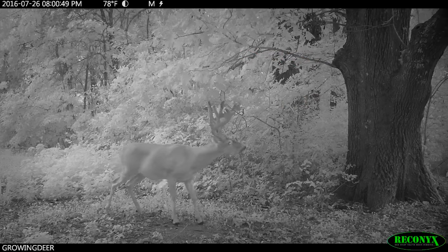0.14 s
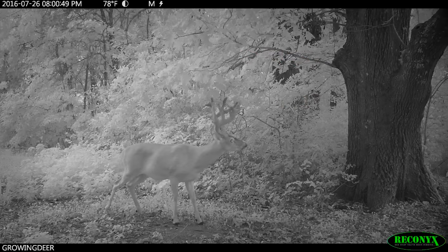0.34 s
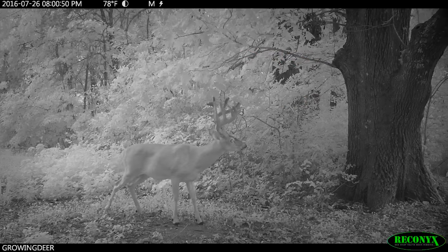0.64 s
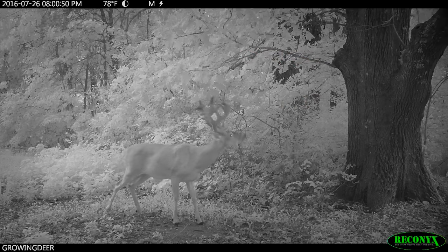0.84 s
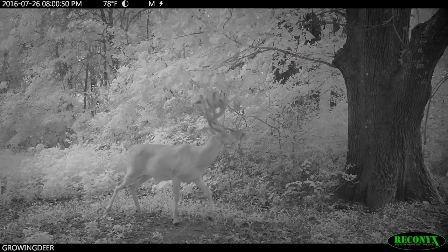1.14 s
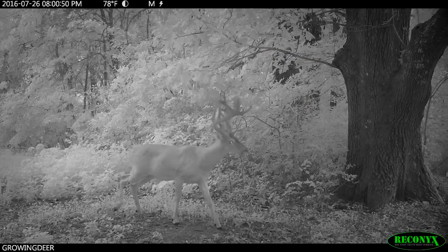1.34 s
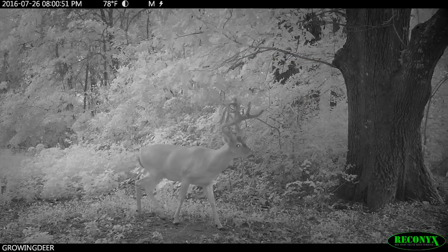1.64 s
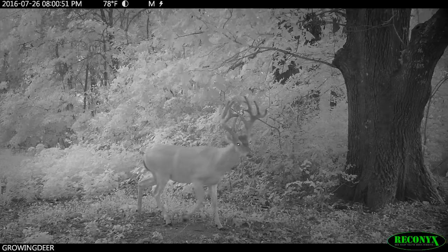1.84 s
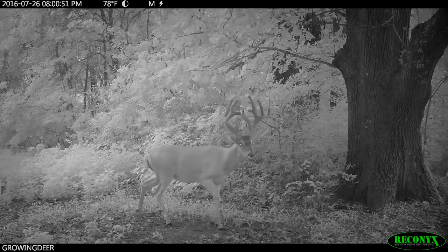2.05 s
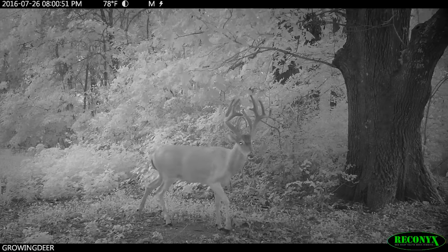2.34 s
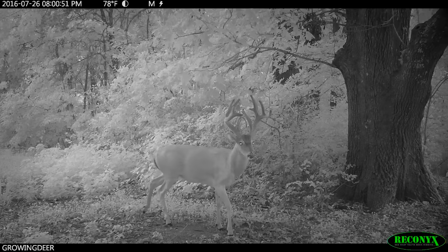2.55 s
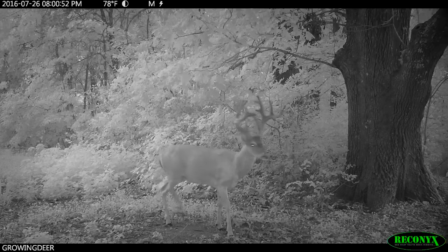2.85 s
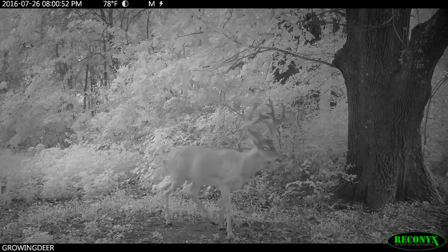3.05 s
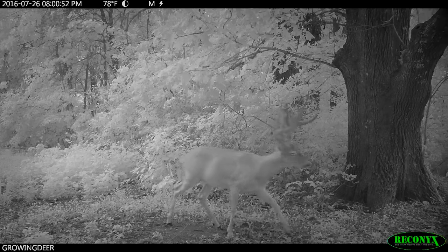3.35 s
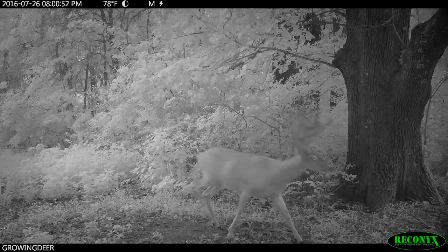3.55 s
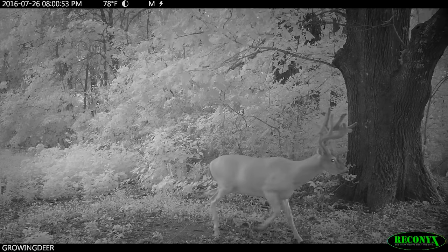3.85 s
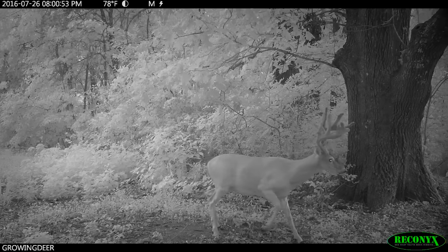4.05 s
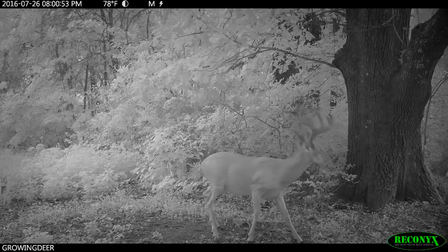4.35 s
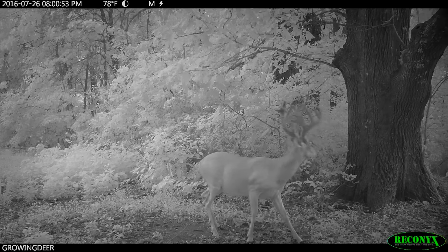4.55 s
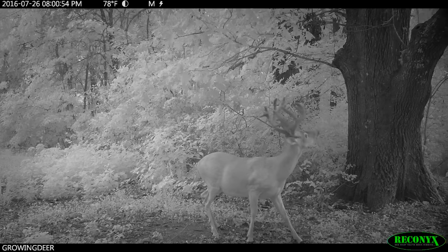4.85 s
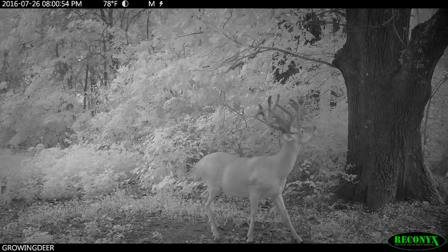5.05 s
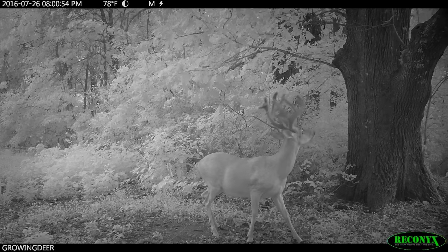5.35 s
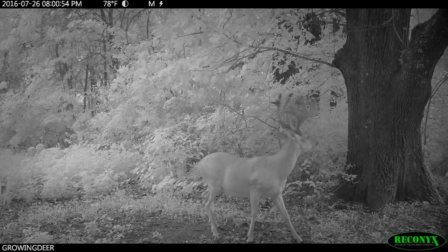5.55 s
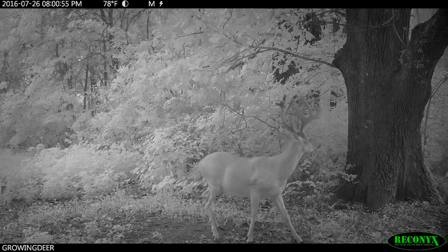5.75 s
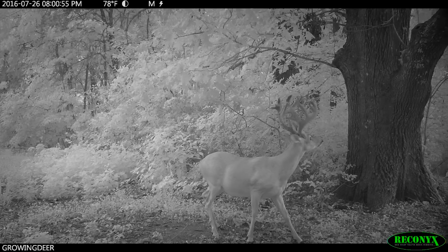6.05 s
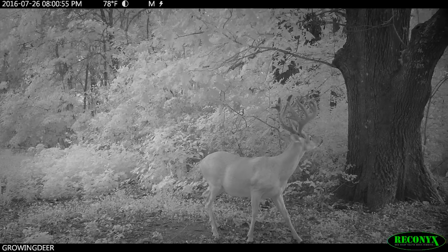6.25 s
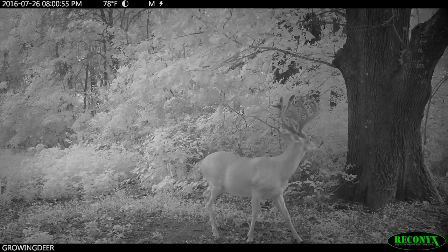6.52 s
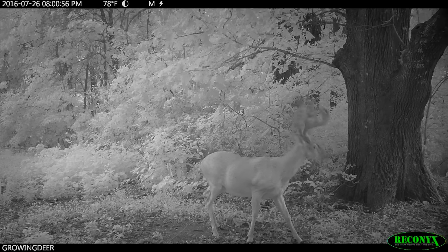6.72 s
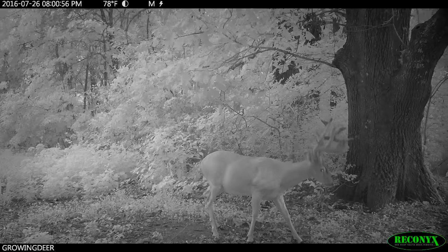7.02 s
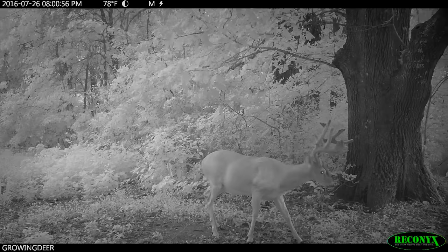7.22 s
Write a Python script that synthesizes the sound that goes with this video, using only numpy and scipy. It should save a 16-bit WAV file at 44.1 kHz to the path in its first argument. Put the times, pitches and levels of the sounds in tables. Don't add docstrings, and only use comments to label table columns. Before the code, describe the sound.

Throughout about 7.4 seconds, a wood at dusk is filled with a high, glassy chorus of crickets around 6 to 7 kHz, breathing slightly, over soft low road rumble and steady microphone hiss. From the start a nearer cricket at about 7.6 kHz gives short, abruptly stopped chirps eight times a second, with quick echoes from trunks; it rests from about 3.5 to 4.3, then resumes. A softer, lower tree-cricket trill swells in by 0.3 and breaks off near 1.7. Close by, a deer's feet make small dry leaf snaps and thin twig ticks, scattered at first, sharper at 1.0, clustered from 3.1 to 3.8, again at 4.3 to 5.2, then sparse until 6.9. A faint distant engine idles, fading after 5; another emerges around 4.6, its low hum rising and strongest near 6.9. The whole sound dims slightly from 6.2 but is still present at the end.

```python
import sys
import numpy as np
from scipy import signal
from scipy.fft import rfft, irfft, next_fast_len
from scipy.io import wavfile
from scipy.ndimage import uniform_filter1d, map_coordinates

SR = 44100
rng = np.random.default_rng(int(sys.argv[2]) if len(sys.argv) > 2 else 0)


def boost_factor(decibels):
    exponent = np.asarray(decibels, float) / 20
    return 10 ** exponent


def dump_mix(stems):
    frames = np.atleast_2d(stems).T
    limited = np.clip(frames, -1, 1)
    pcm = np.round(limited * 32767).astype(np.int16)
    wavfile.write(sys.argv[1], SR, pcm)


N = 325458

# [f/Hz, density/dB per Hz]
ROAD_SPECTRUM = [(12, -24), (25, 0.5), (40, 2.5), (65, -0.5), (110, -5), (160, -9.5), (200, -15),
                 (270, -18), (400, -27), (700, -30), (1200, -120)]
# [f/Hz, density/dB per Hz]
AIR_SPECTRUM = [(150, -18), (300, -1.5), (650, -5.5), (1470, -6.5), (3560, -8.5), (4720, -7.5), (5550, -4),
                (5680, -10), (5780, 2.5), (5950, 8), (6150, 6), (6400, -36.5), (7000, -120)]
# [f/Hz, density/dB per Hz]
HISS_SPECTRUM = [(6000, -120), (6900, -13), (7250, 2), (7500, -5.5), (7900, -5), (8760, -10),
                 (10700, -16.5), (14300, -19), (15000, -19.5), (15300, -68)]
# [f/Hz, likeness 0..1]
EAR_LIKENESS = [(20, 0.39), (60, 0.82), (160, 0.798), (280, 0.28), (500, 0.3), (1200, 0.52), (3300, 0.064),
                (6000, 0.021), (9000, 0.1), (15000, 0.3)]
# [t/s, firing f/Hz, level/dB]
IDLING_ENGINE = [
    (0, 37.4, -61),
    (1.1, 37.09, -52.5),
    (2.3, 37.34, -53),
    (3.0, 37.04, -52.5),
    (4.5, 37, -52.5),
    (5.5, 36.43, -60),
    (7.38, 36.6, -66.5),
]
# [multiple of firing f, level/dB]
IDLING_ORDERS = [(1, -7), (2, 0), (3, -2), (4, -7.5)]
# [t/s, firing f/Hz, level/dB]
PULLING_ENGINE = [
    (4.6, 49.96, -54.5),
    (5.2, 50.25, -51),
    (5.7, 50.68, -52.5),
    (6.3, 51.6, -48.5),
    (6.9, 52.07, -45),
    (7.38, 53.05, -47),
]
# [multiple of firing f, level/dB]
PULLING_ORDERS = [(2, 0), (3, -5), (4, -19), (5, -19), (6, -18)]
# [f/Hz, spread between singers/Hz, pulse rate/Hz, pulse/ms, left-right/dB]
CHORUS_KINDS = [
    (6015, 24, 31, 20, 2.5),
    (6235, 48, 63, 10, 3),
    (6755, 165, 67, 5.5, 3),
]
# [level/dB, depth in the shared lull/dB (negative rises), own swell/dB, swell rate/Hz]
CHORUS_SWELLS = [(-54.5, 3, 3, 13), (-49.5, -1.5, 1.7, 11), (-42, 3.5, 0.8, 13)]
# (f/Hz, spread/Hz, pulse rate/Hz, pulse/ms, left-right/dB)
FAR_KIN = (7600, 49.5, 7, 39.5, -2)
# [t/ms, level/dB, f/Hz]
WING_STROKE = [(-25, -40, 7480), (-21, -20, 7510), (-17, -8.5, 7560), (-12, -1.2, 7615), (-6, -1.2, 7655),
               (-1.3, .6, 7610), (.4, -11, 7450), (2.5, -19, 7300), (6, -40, 7150)]
# [t of a stroke's stop/s, strokes so far]
STROKE_PACE = [(.0286, 0), (.1632, 1), (1.0245, 8), (1.5208, 12), (2.1373, 17), (2.6061, 21), (3.34, 27),
               (3.4708, 28), (4.3314, 29), (4.7087, 32), (4.9672, 34), (5.2112, 36), (5.7117, 40),
               (7.291, 53)]
# [delay/ms, left level/dB, right level/dB]
TRUNK_ECHOES = [
    (0, -1.5, 1),
    (5.13, -37, -52),
    (14.036, -14, -8.5),
    (18.7, -10.5, -20),
    (27.4, -25, -19),
    (34.8, -12, -33),
    (52.6, -33.5, -15),
    (65, -20, -27),
    (72.4, -24, -30),
]
# [t/s, peak level/dB, brightness/dB, f/Hz]
LEAF_SNAPS = [(.0672, -37.5, -5, 3560), (0.266, -39, -13, 2050), (0.329, -36.5, -22, 3070),
              (0.3797, -36.5, -25, 1340), (.4759, -42.5, -14, 1640), (0.9937, -30.5, -11, 2160),
              (1.2918, -38, -23, 1320), (1.654, -38.5, -9, 1530), (1.7193, -40, -12, 2630),
              (2.4023, -37, -1.5, 2910), (3.1055, -43, -16, 1110), (3.1396, -30.5, -22, 2450),
              (3.1838, -30, -15, 4520), (3.398, -33, -10, 4150), (3.5136, -34.5, 0, 2930),
              (3.5257, -31, -9, 3640), (3.6324, -30.5, -10, 3430), (3.814, -39.5, -19, 1720),
              (4.122, -47, -12, 5500), (4.2601, -39.5, -21, 2080), (4.368, -34.5, 2, 1475),
              (4.8945, -33.5, -8, 2150), (4.9208, -38, -6, 1690), (5.0391, -39.5, -4, 2660),
              (6.88, -36, -15, 2964)]
# [t/s, peak level/dB, brightness/dB, f/Hz]
RINGING_LEAVES = [(.164, -40, -1, 1680), (.9112, -42, -6, 2710), (1.0874, -42, -2, 5400),
                  (2.2326, -40, -13, 2970), (3.6478, -35, 0, 4660), (5.1812, -31.5, -25, 4900),
                  (5.8357, -38.5, -22, 2330), (6.2248, -34, -12, 4356), (6.4087, -40, -16, 2430),
                  (6.6977, -39.5, -4, 3650)]
# [t/s, peak level/dB]
TWIG_TICKS = [(0.5304, -43), (.5685, -52), (.598, -41.5), (0.7264, -49.5), (1.3728, -55), (1.699, -52),
              (2.1884, -48.5), (2.827, -52.5), (2.9518, -55), (3.0605, -55), (3.599, -50), (3.799, -46),
              (3.99, -51.5), (4.2768, -47.5), (5.734, -54), (6.5836, -51), (6.7829, -52)]
# [t/s, level/dB]
TRILL_LEVEL = [
    (.1, -67),
    (.35, -56),
    (.6, -54.5),
    (1.0, -55),
    (1.4, -54.5),
    (1.65, -58),
    (1.75, -84),
]
MIC_OFFSET = [
    [-.0408],
    [-.0535],
]
# [t/s, gain]
CLOSING_FADE = [(6.15, 1), (7.38, .67)]

STEP = 16
LULL_S, LULL_EVERY_S = 0.8, 0.81
SNAP_OCT, RINGER_OCT, TICK_OCT = 0.64, 0.31, 0.45
TICK_HZ, TICK_BRIGHT_DB, SNAP_PAN_DB = 5640, 12, 2.5


def unit(x):
    return x / np.sqrt(np.mean(x ** 2) + 1e-20)


def along(points, hz):
    f, v = np.transpose(points)
    return np.interp(np.log(hz + 1), np.log(f + 1), v)


def curves(rows):
    s, *cols = np.transpose(rows)
    return [np.interp(np.arange(N) / SR, s, c) for c in cols]


def wobble(rate, count=1, size=N, step=1):
    knots = rng.standard_normal((count, int(N * rate / SR) + 4))
    at = np.arange(0, N, STEP) * rate / SR
    slow = [map_coordinates(k, [at]) for k in knots]
    wanted = np.arange(size) * step / STEP
    return np.squeeze([np.interp(wanted, np.arange(len(at)), v) for v in slow])


def filtered(x, response):
    m = next_fast_len(N + 8192)
    return irfft(rfft(x, m) * response(np.fft.rfftfreq(m, 1 / SR)), m)[..., :N]


def rush(spectrum, patchy_db):
    z = signal.stft(rng.standard_normal((2, N + 512)), nperseg=512)[2]
    field = rng.standard_normal(z.shape[1:])
    field = uniform_filter1d(uniform_filter1d(field, size=8, axis=0), size=8, axis=1)
    pair = signal.istft(z * boost_factor(patchy_db * unit(field)), nperseg=512)[1][:, :N]

    def mid_side(hz):
        turn = np.arccos(np.clip(along(EAR_LIKENESS, hz), -1, 1)) / 2
        return boost_factor(along(spectrum, hz)) * [np.cos(turn), np.sin(turn)]

    mid, side = filtered(pair, mid_side)
    return unit(np.array([mid + side, mid - side]))


def engine(rows, orders, unsteady_db):
    hz, level_db = curves(rows)
    turn = 2 * np.pi * np.cumsum(hz * (1 + 0.005 * wobble(4))) / SR
    out = 0
    for k, db in orders:
        gain = boost_factor(level_db + 2.5 + db + unsteady_db * wobble(2.97))
        ear_phase = 6 * rng.random() + 0.14 * wobble(2.2, count=2)
        out = out + gain * np.sin(k * turn + ear_phase)
    return out


def background():
    road = boost_factor(-44 + 1.06 * wobble(1.27)) * rush(ROAD_SPECTRUM, patchy_db=-0.5)
    idling = engine(IDLING_ENGINE, IDLING_ORDERS, unsteady_db=3.5)
    pulling = engine(PULLING_ENGINE, PULLING_ORDERS, unsteady_db=0.55)
    air = boost_factor(-47.5 + 0.66 * wobble(9)) * rush(AIR_SPECTRUM, patchy_db=1.0)
    hiss = boost_factor(-51.5 + 0.49 * wobble(9.9)) * rush(HISS_SPECTRUM, patchy_db=1.7)
    return road + idling + pulling + air + hiss


def singers(hz, spread_hz, rate, pulse_ms, pan_db, count, t60, near):
    n, sr = N // STEP + 1, SR / STEP

    def slow(knot_rate):
        return wobble(knot_rate, count=count, size=n, step=STEP).reshape(count, n)

    own_pace = .04 * rng.standard_normal((count, 1)) * (count > 1)
    pace = rate * (1 + own_pace + 0.02012 * slow(3))
    beat = (np.cumsum(pace, axis=1) / sr + rng.random((count, 1))) % 1
    duty = np.clip(rate * pulse_ms / 1000, .05, 1)
    gate = np.sin(np.pi * np.clip(beat / duty, 0, 1)) ** 2
    ranks = ((np.arange(count) + .5) * 4000 / count).astype(int)
    place = np.sort(rng.standard_normal(4000))[ranks, None]
    detune = spread_hz * (place + .3 * slow(2)) + (12 + .2 * spread_hz) * slow(30)
    song = boost_factor(4.4 * slow(5)) * gate * np.exp(2j * np.pi * np.cumsum(detune, axis=1) / sr)
    t = np.arange(int(sr / 5)) / sr
    tails = (rng.standard_normal((2, count, len(t), 2)) @ [1, 1j]) * boost_factor(-60 * t / t60)
    tails /= np.linalg.norm(tails, axis=-1, keepdims=True)
    scattered = signal.fftconvolve(song[None], tails, axes=-1)[..., :n]
    ears = (near * song + scattered).sum(axis=1)
    power = uniform_filter1d(np.mean(np.abs(ears) ** 2, axis=0), size=500)
    ears /= np.sqrt(np.abs(power) / 2 + 1e-9)
    carrier = np.exp(2j * np.pi * hz * np.arange(N) / SR)
    heard = np.real(signal.resample_poly(ears, STEP, 1, axis=1)[:, :N] * carrier)
    return boost_factor([[pan_db / 2], [-pan_db / 2]]) * heard


def chorus():
    lull = np.cos(np.pi * (np.arange(N) / SR - LULL_S) / LULL_EVERY_S) ** 4
    out = boost_factor(-75) * singers(*FAR_KIN, count=9, t60=.3, near=0.11)
    for kind, (db, lull_db, swell_db, rate) in zip(CHORUS_KINDS, CHORUS_SWELLS):
        level_db = db - lull_db * lull + swell_db * wobble(rate)
        out = out + boost_factor(level_db + 2.5) * singers(*kind, count=24, t60=0.088, near=0.53)
    return out


def wood(x, t60):
    t = np.arange(SR // 4) / SR
    tail = rng.standard_normal((2, len(t))) * boost_factor(-60 * t / t60)
    return signal.fftconvolve(x[None], tail / np.linalg.norm(tail[0]), axes=1)[:, :N]


def near_cricket():
    ms, level_db, hz = np.transpose(WING_STROKE)
    when, number = np.transpose(STROKE_PACE)
    stops = np.interp(np.arange(number[-1] + 1), number, when)
    chance = rng.standard_normal((len(stops), 8))
    lead = SR // 20
    dry = np.zeros(N + 2 * lead)
    t = np.arange(-lead, lead // 4) * 1000 / SR
    for s, c in zip(stops, chance):
        u = np.where(t < 0, t * (1 + 0.033 * c[0]), t)
        flutter_db = 1.15 * c[1] * np.sin(.5 * t + 3 * c[2]) + 1.06 * c[3] * np.sin(0.91 * t + 3 * c[4])
        phase = 2 * np.pi * np.cumsum(np.interp(u, ms, hz) + 10 * c[5]) / SR
        stroke_db = np.interp(u, ms, level_db, left=-120, right=-120)
        shape = boost_factor(-28 + .5 * c[7] + flutter_db + stroke_db)
        dry[round(s * SR):][:len(t)] += shape * np.sin(phase + 9 * c[6])
    heard = 0
    for delay, left, right in TRUNK_ECHOES:
        heard = heard + boost_factor([[left], [right]]) * np.roll(dry, round(delay * SR / 1000))
    return heard[:, lead:lead + N] + boost_factor(-24.5) * wood(dry[lead:lead + N], t60=0.45)


def leaves():
    out = np.zeros((2, N + SR))
    t = np.arange(SR // 25) / SR

    def ring(hz, t60):
        return boost_factor(-60 * t / t60) * (1 - np.exp(-t * hz / 0.25)) * np.sin(2 * np.pi * hz * t)

    events = [(*row, SNAP_OCT) for row in LEAF_SNAPS]
    events += [(*row, RINGER_OCT) for row in RINGING_LEAVES]
    events += [(s, db, TICK_BRIGHT_DB, TICK_HZ, TICK_OCT) for s, db in TWIG_TICKS]
    for s, db, bright_db, hz, breadth in events:
        pan_db = SNAP_PAN_DB * rng.standard_normal()
        body = ring(hz, 2.66 / (hz * max(breadth, .08)))
        stem, rim = ring(hz / 1.8, 5 / hz), ring(hz * 1.65, 5.1 / hz)
        body += 0.57 * breadth * (stem + rim)
        tick = ring(7080, 0.0031) + 0.51 * ring(9240, 0.0018) + .5 * ring(13500, 0.00083)
        tick *= boost_factor(bright_db + 6.5) * (1 - np.exp(-t / 0.00014))
        sparse = rng.random(len(t)) < .02
        cracks = boost_factor(-5.5 - 60 * t / 0.09) * rng.standard_normal((2, len(t))) * sparse
        cracks[:, 0] = 1
        snap = signal.fftconvolve(cracks, (body + tick)[None], axes=1)[:, :len(t)]
        pan = boost_factor([[pan_db / 2], [-pan_db / 2]])
        out[:, round(s * SR):][:, :len(t)] += boost_factor(db + 8.0) * pan * snap
    return out[:, :N]


def tree_cricket():
    level = boost_factor(curves(TRILL_LEVEL)[0] - 6.5)
    return level * singers(hz=2715, spread_hz=12, rate=73.8, pulse_ms=11.0, pan_db=0.24,
                           count=1, t60=.05, near=1.3)


def scene():
    return background() + chorus() + near_cricket() + leaves() + tree_cricket()


def roll_off(x):
    return signal.sosfilt(signal.butter(12, 15700, fs=SR, output="sos"), x)


def record(dry):
    band = filtered(dry, lambda hz: hz < 15200)
    mix = (band + MIC_OFFSET) * curves(CLOSING_FADE)[0]
    return roll_off(mix)


dry = scene()
out = record(dry)
dump_mix(out)
```